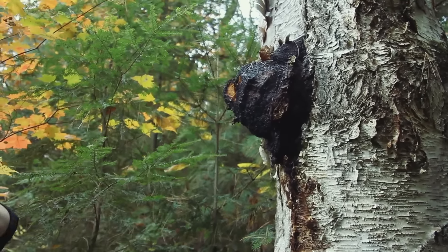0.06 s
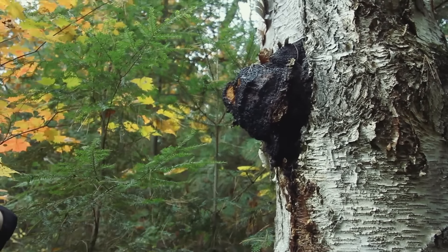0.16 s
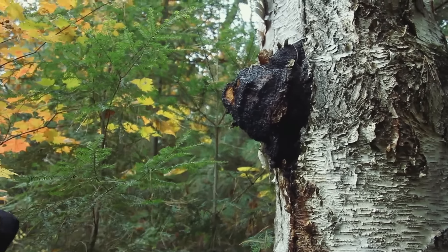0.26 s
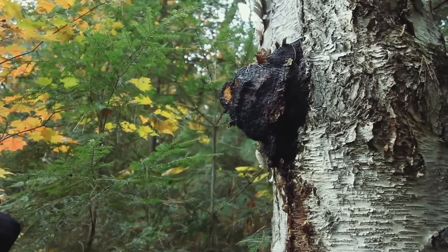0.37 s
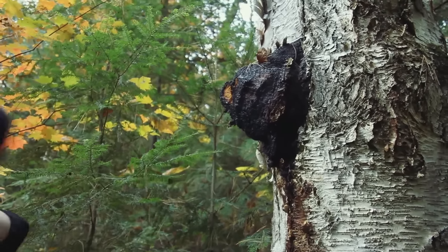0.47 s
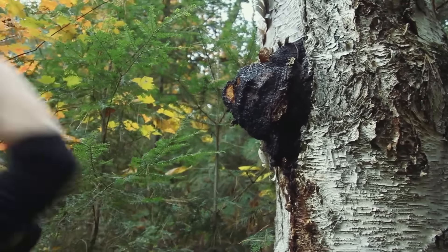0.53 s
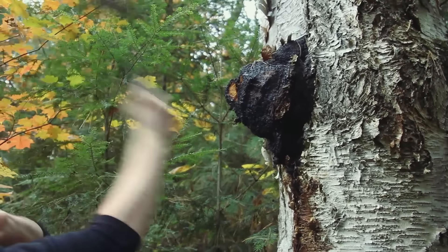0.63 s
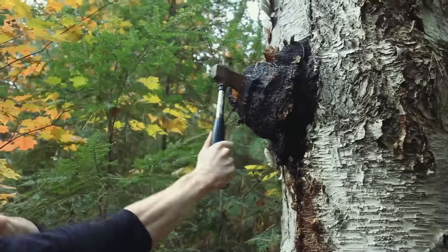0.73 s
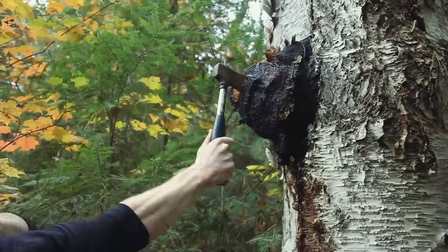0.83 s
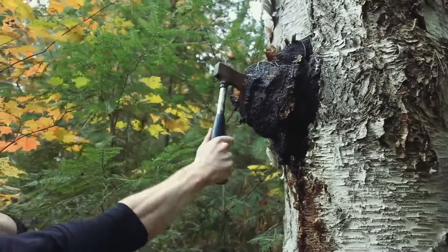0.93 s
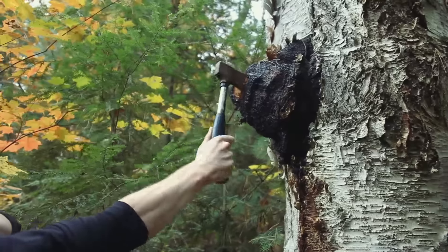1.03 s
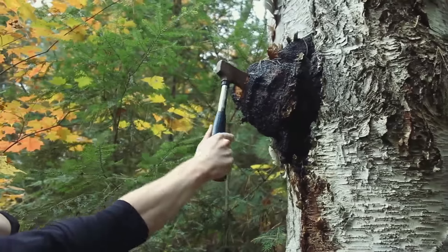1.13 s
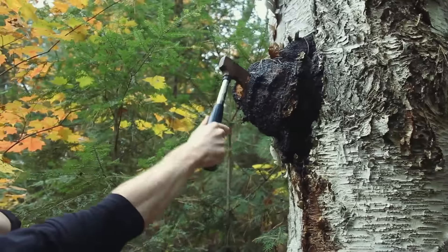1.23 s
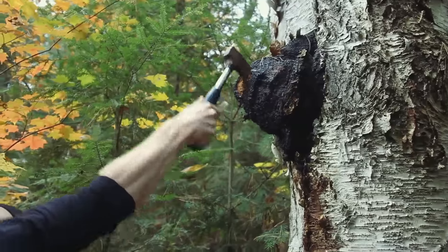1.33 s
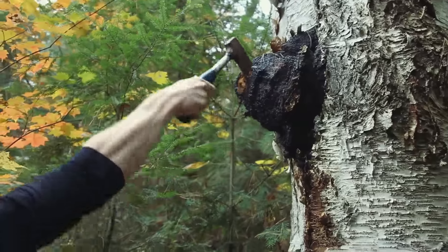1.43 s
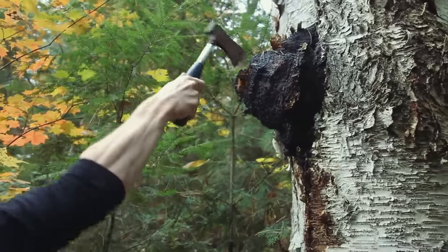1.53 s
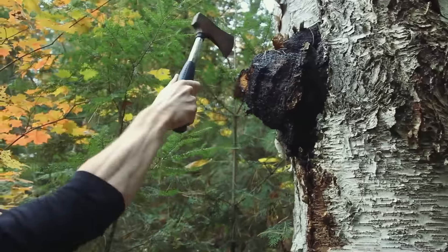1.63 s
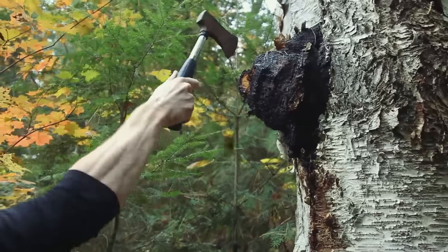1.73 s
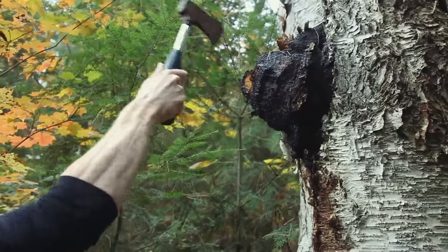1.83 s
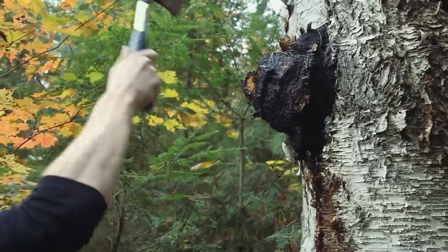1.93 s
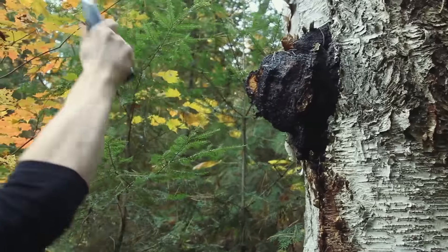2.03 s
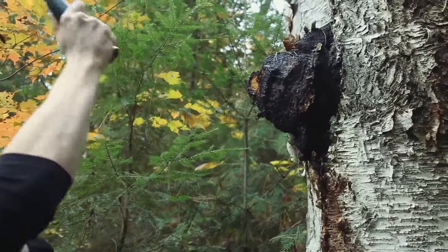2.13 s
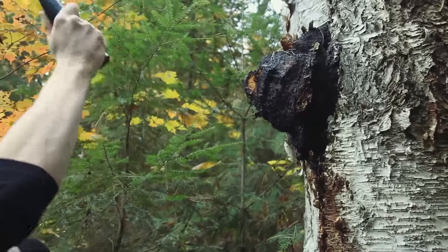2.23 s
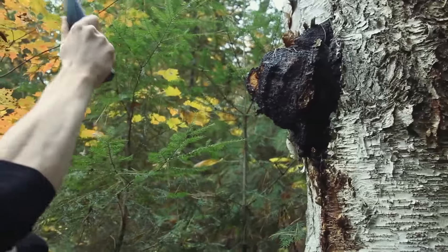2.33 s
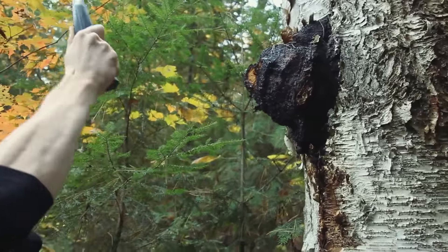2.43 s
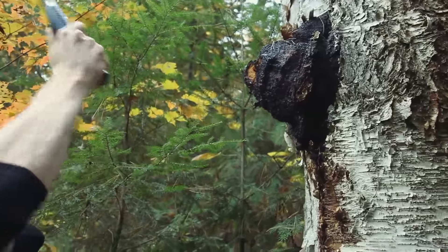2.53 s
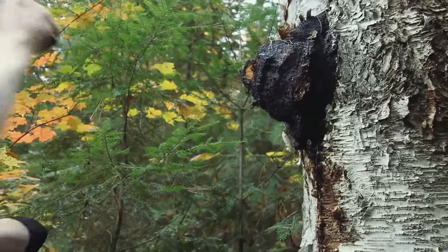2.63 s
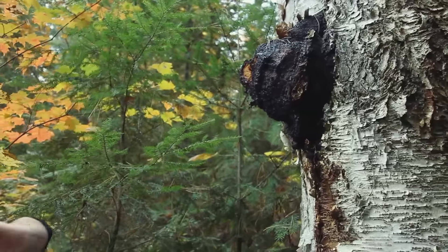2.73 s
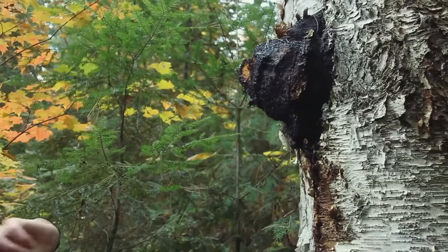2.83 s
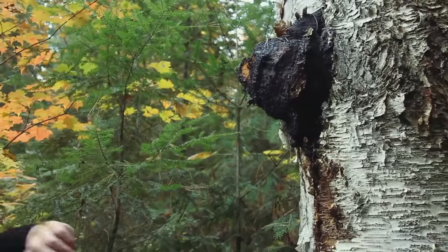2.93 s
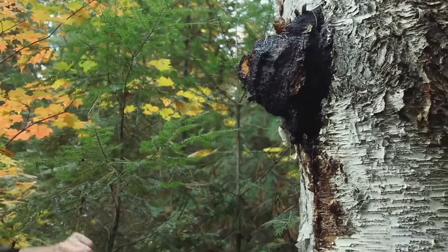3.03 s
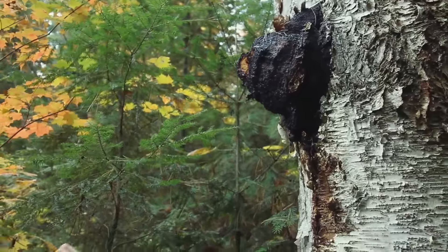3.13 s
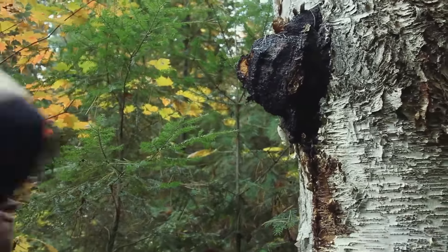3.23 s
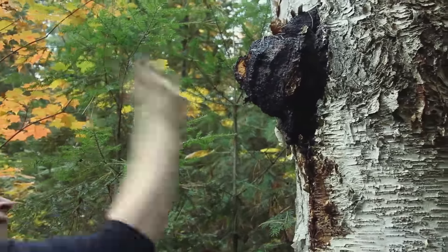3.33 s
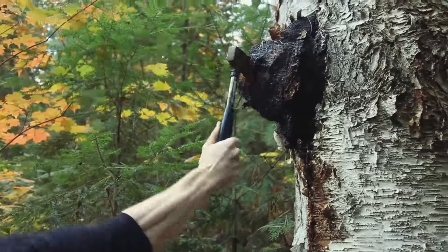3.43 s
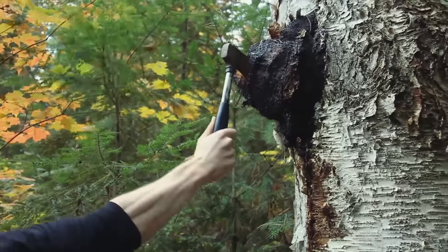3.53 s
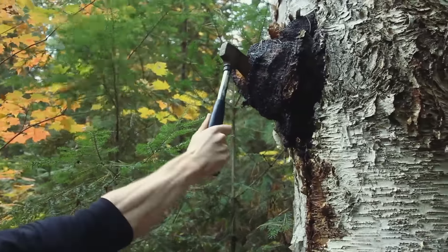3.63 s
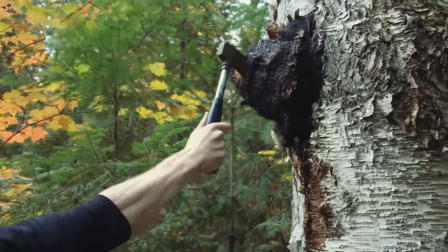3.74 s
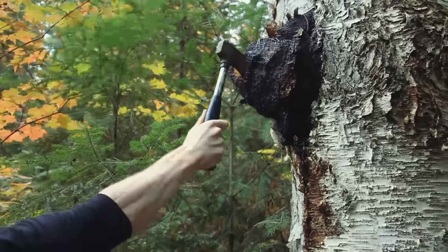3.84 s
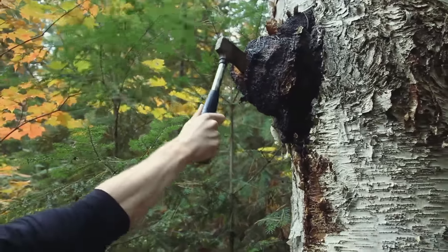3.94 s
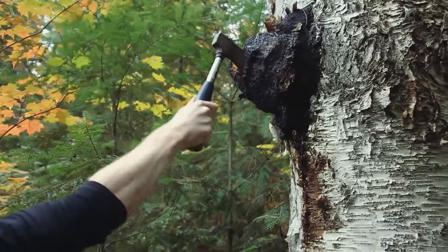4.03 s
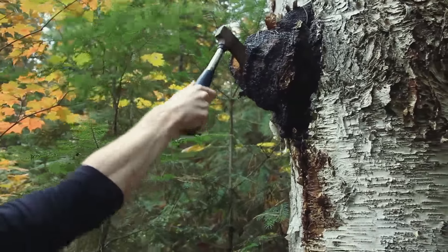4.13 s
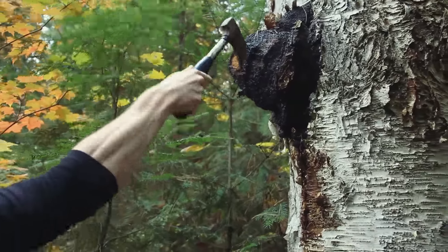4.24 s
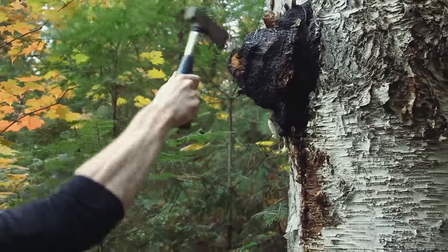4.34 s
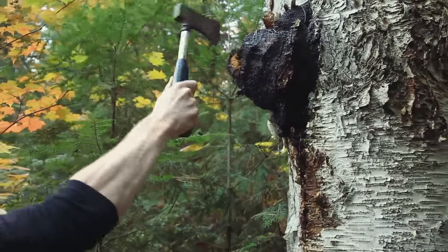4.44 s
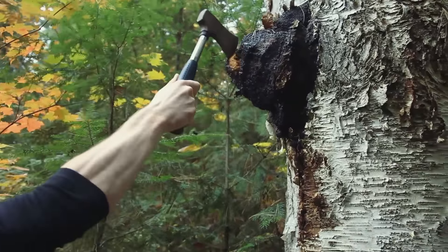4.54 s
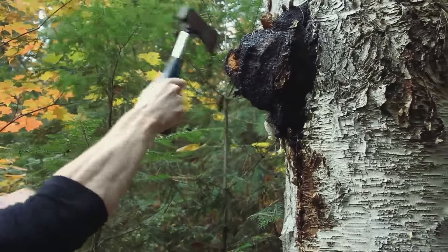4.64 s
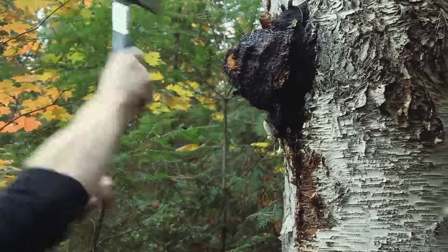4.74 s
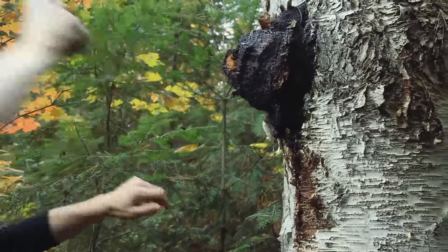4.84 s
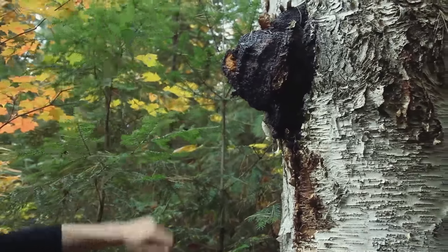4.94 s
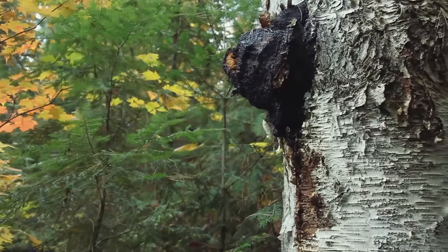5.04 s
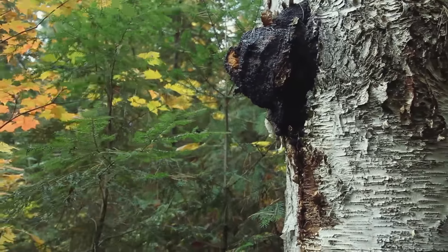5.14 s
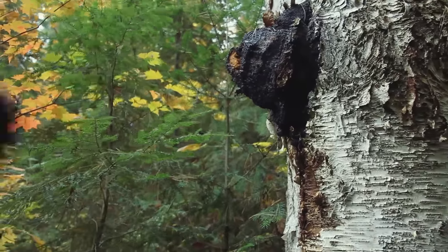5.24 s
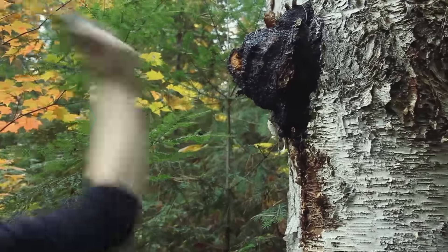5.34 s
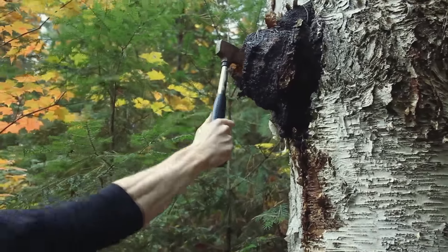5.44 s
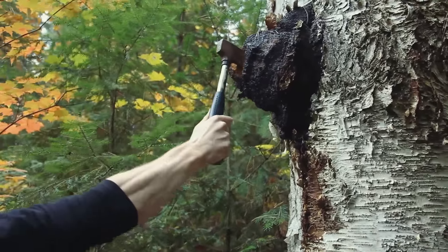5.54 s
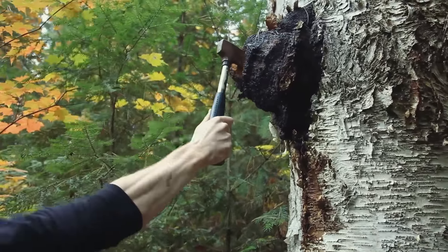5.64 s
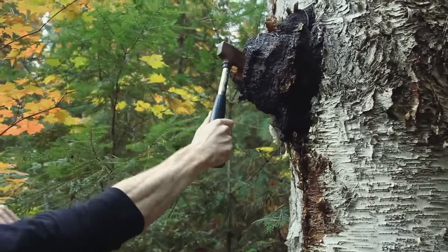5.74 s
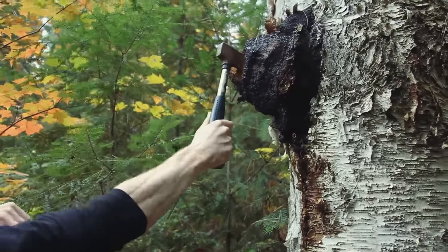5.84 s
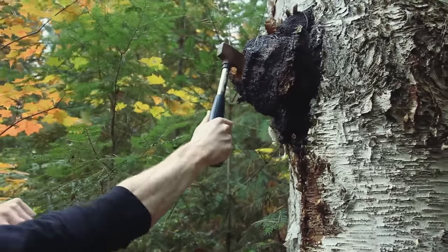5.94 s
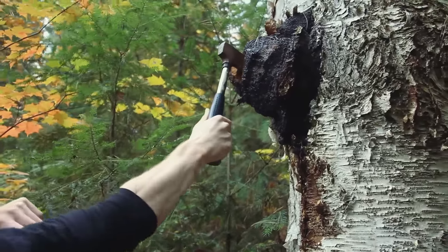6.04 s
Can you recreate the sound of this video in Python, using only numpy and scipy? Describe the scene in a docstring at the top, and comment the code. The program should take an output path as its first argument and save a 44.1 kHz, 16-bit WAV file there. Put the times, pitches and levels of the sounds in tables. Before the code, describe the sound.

Outdoors in a quiet forest, a hatchet strikes a hard crusty growth on a trunk three times, spaced a little over two seconds apart. Each blow is abrupt, very loud and distorted at a close microphone, with a bright crack, low thump and short woody knock. Small creaks, snaps and crumbling bits follow as the blade is levered free, a sleeve swishes softly, and faint echoes scatter among the trees.

```python
"""Three hatchet blows into a hard conk on a birch trunk: blade impact, cracking crust and damped modes. Each
opens with bright grit as the blade enters and drives a close microphone into overload, heard as clipping and a
low thump. The forest scatters a faint echo; the levered blade creaks by stick and slip, and crumbs crackle as
grains. A sleeve swishes as friction noise that follows the speed of the arm. Filtered noise makes a soft forest
hush with one puff of breeze and a far rumble that swells once."""
import sys
import numpy as np
from scipy import signal
from scipy.fft import rfft, irfft
from scipy.io import wavfile
from scipy.ndimage import uniform_filter1d

SR = 44100
rng = np.random.default_rng(int(sys.argv[2]) if len(sys.argv) > 2 else 0)


def master_out(mix):
    """Clip the mix to full scale and print it as 16-bit PCM to the path in sys.argv[1]."""
    frames = np.transpose(np.atleast_2d(mix))
    ceiling = np.clip(frames, -1, 1)
    pcm = np.round(ceiling * 32767).astype(np.int16)
    wavfile.write(sys.argv[1], SR, pcm)


N = 268216
T = np.arange(N) / SR

# Air in the trees: [f/Hz, level/dB]
FOREST_SPECTRUM = [(15, -1), (25, -5), (37, -8), (94, -7.5), (200, -15), (235, -10.5), (300, -10),
                   (542, -10.5), (621, -10), (730, -8.5), (982, -9.5), (2330, -22.5), (3490, -22.5),
                   (4580, -32), (15800, -44.5)]
# Breeze in the needles: [f/Hz, level/dB]
BREEZE_SPECTRUM = [(400, -31), (1000, -16), (1450, 9), (1900, -2), (4000, -36), (15000, -28)]
# Far low rumble: [f/Hz, level/dB]
RUMBLE_SPECTRUM = [(25, -34), (50, -9.5), (68, 7), (85, -7), (110, -30), (300, -55)]
# Falling crumbs and leaves: [f/Hz, level/dB]
CRUMB_SPECTRUM = [(500, -35), (1800, 2.5), (2700, -0.5), (3600, 7.5), (4800, -1), (7500, -6.5),
                  (11000, -11.5), (15500, -17.5)]
# Cloth of the sleeve: [f/Hz, level/dB]
CLOTH_SPECTRUM = [(400, -2.5), (1500, -2), (2800, -2.5), (3300, 5), (4000, -2), (6500, -4.5), (8500, -12),
                  (11500, -15), (15000, -27)]
# Crumbs and dry leaves stirred by each movement: [peak t/s, level/dB, half width to 1/e t/s]
RUSTLES = [(.12, -53, .06), (1.45, -53.5, 1), (2.2, -53.5, 0.099), (2.58, -46.5, 0.016), (3.22, -47, 0.18),
           (3.72, -45, 0.47), (4.3, -47.5, 0.79), (5.36, -48, 0.13), (5.8, -45, 0.16)]
# Sleeve on the backswings: [start t/s, length t/s, level/dB]
SWINGS = [(2.787, 0.23, -36), (4.923, 0.3, -43)]
# Dry crust under the blade: [f/Hz, level/dB]
GRIT_SPECTRUM = [(500, -31), (1800, -7.5), (2700, -4.5), (3600, 9), (4800, -0.5), (7500, -8), (11000, -13),
                 (15500, -24)]
# Modes of the conk answering a creak: [f/Hz, level/dB, t60/s]
CREAK_MODES = [(590, -2, 0.015), (1290, 15, 0.0027), (2140, 10, 0.0098), (2680, 11, 0.0032)]
# Brittle crust snapping under the lever, and stray ticks: [t/s, level/dB, conk level/dB, treble level/dB]
SNAPS = [(0.942, -41.5, -17, 4), (0.966, -46, -23, 7), (1.028, -45, -19, 8), (1.166, -44.5, -18, 9),
         (1.304, -28, -4.5, -20), (1.3432, -26.5, 4.5, -2), (1.424, -34, 0, -6), (2.274, -29.5, -2, -1),
         (2.856, -22, -17, -6), (3.235, -31, -6, -5), (3.6175, -20, -24, 2), (4.206, -36, -14, 3),
         (4.266, -32, -12, -12), (5.502, -17, -5, 0.5), (5.626, -35, 5, 0), (6.013, -27.5, -5.5, -6)]
# Blade scraping in the cut: [t/s, level/dB, time scale t/s]
SCRAPES = [(1.249, -42.5, .026), (1.401, -35.5, .017), (1.553, -40, 0.029), (2.297, -42.5, 0.02),
           (3.594, -24.5, 0.0073), (3.663, -34.5, 0.0084), (3.801, -31.5, 0.025), (3.825, -31.5, 0.036),
           (4.033, -31.5, 0.0079), (4.129, -38.5, 0.014), (4.159, -38.5, 0.022), (4.371, -40.5, 0.032),
           (4.4227, -37, 0.021), (4.61, -42.5, 0.022), (5.716, -36, 0.035), (5.882, -28.5, 0.0076),
           (6.072, -36.5, 0.0079)]
# Blows: [t/s, conk level/dB, trunk level/dB, crack level/dB, entry grit level/dB, cut at entry f/Hz, cut at
# rest f/Hz, cut level/dB, mode pitch factor, far echo level/dB, echo treble level/dB]
BLOWS = [(0.7679, 6.5, 8, 14, 12.5, 850, 423, 20, 0.95, -35, 1.5),
         (3.4630, 2, 4, 12.5, 16, 1364, 707, 18.5, 0.95, -44, 1),
         (5.4888, -7, 2.5, 10, 0.5, 2785, 490, 5.5, 0.9, -47, 15.5)]
# Trunk modes before the pitch factor: [f/Hz, level/dB, t60/s]
TRUNK_MODES = [(145, -18.5, 0.12), (194.6, -19, 0.1), (255.4, -3.5, 0.085), (330, -3, 0.064)]
# Conk modes before the pitch factor: [f/Hz, level/dB, t60/s]
CONK_MODES = [(427.4, 6, 0.043), (613.7, 3.5, 0.034), (726, 3, .039), (958, 0, 0.03), (1025, 9.5, 0.022),
              (1280, 2, 0.022)]
# Hatchet head damped by the cut, before the pitch factor: [f/Hz, level/dB, t60/s]
HEAD_MODES = [(2230, -6.5, 0.021), (2904, -6.5, 0.021), (3644, -10.5, 0.0057)]
# Breaking crust: [f/Hz, level/dB]
CRACK_SPECTRUM = [(500, 15.5), (1500, -5.5), (3300, 19), (4600, 2.5), (8000, -1), (15000, -22.5)]
# Bright grit of the blade entering at the start of a blow: [f/Hz, level/dB]
ENTRY_SPECTRUM = [(1000, -38), (2500, 12), (3800, 1.5), (5500, -2), (9000, -16), (13000, 6),
                  (16000, -12.5)]
# Echo from the trees: [f/Hz, level/dB]
ECHO_SPECTRUM = [(80, -6), (170, 1), (280, 1.5), (650, 2.5), (1050, -5.5), (1600, -14), (2900, -9.5),
                 (4500, -22), (12000, -52)]

FOREST_DB = -40.5
BREEZE_S, BREEZE_DB, BREEZE_WIDTH_S = 2.22, -49, 0.15
RUMBLE_DB = -52  # steady part
RUMBLE_SWELL_S, RUMBLE_SWELL_DB, RUMBLE_RISE_S, RUMBLE_FALL_S = 5.77, -46, 1.3, 0.5
SNAP_S = 0.0036  # time scale of a snap
SNAP_TREBLE_HZ = 6000  # corner above which each snap is made brighter or duller by its own treble level
SCRAPE_BODY_DB = -5  # conk under a scrape
CRACK_LOW_HZ = 450  # low cut of the breaking crust
TOP_HZ = 16000  # low-pass of the microphone signal


def undb(db):
    """Level definition: decibels to amplitude gain."""
    return 10 ** (np.asarray(db) / 20)


def unit(x):
    """Normalisation: scale to rms 1."""
    return x / np.sqrt(np.mean(x ** 2))


def colour(x, points, size=4096):
    """Minimum-phase filtering: a causal response of unit energy shaped by [f/Hz, level/dB] points."""
    hz, db = np.transpose(points)
    grid = np.maximum(np.fft.rfftfreq(size, 1 / SR), 1)
    level = np.interp(np.log(grid), np.log(hz), db)
    # folding the cepstrum onto positive times makes the response causal
    cepstrum = irfft(np.log(undb(level)))
    cepstrum[1:size // 2] *= 2
    cepstrum[size // 2 + 1:] = 0
    response = irfft(np.exp(rfft(cepstrum)))
    return signal.fftconvolve(x, response / np.linalg.norm(response))[:len(x)]


def treble_shelf(x, order, hz, db):
    """Shelving: the part above a corner frequency is raised or lowered and recombined."""
    high_pass = signal.butter(order, hz, "high", fs=SR)
    return x + (undb(db) - 1) * signal.lfilter(*high_pass, x)


def fade(t, t60):
    """Exponential damping: a fall of 60 dB in t60 seconds."""
    return np.exp(-np.log(1000) * t / t60)


def ring(t, modes, pitch=1):
    """Modal superposition: damped sines, with neighbours swinging in opposite directions."""
    total = np.zeros(len(t))
    for k, (hz, db, t60) in enumerate(modes):
        mode = undb(db) * np.sin(2 * np.pi * hz * pitch * t) * fade(t, t60)
        total += (-1) ** k * mode
    return total


def grains(n, per_s, spread_db):
    """Random fracture: sparse impulses of either sign, most weak and a few strong; rms 1."""
    sizes = undb(spread_db * np.minimum(rng.exponential(size=n), 4))
    signs = rng.choice([-1, 1], n)
    occurs = rng.random(n) < per_s / SR
    return unit(signs * sizes * occurs)


def walk(rate):
    """Slow fluctuation: held random values smoothed into a drift with a spread near 1."""
    k = int(SR / rate)
    held = np.repeat(rng.standard_normal(N // k + 1), k)
    return uniform_filter1d(held, k)[:N]


def swell(peak_s, db, rise_s, fall_s):
    """Gaussian envelope: the gain of a movement that gathers speed, peaks and slows."""
    width = np.where(T < peak_s, rise_s, fall_s)
    return undb(db) * np.exp(-((T - peak_s) / width) ** 2)


def add(out, s, x):
    """Linear superposition: mix x in at time s."""
    i = int(s * SR)
    out[i:i + len(x)] += x[:max(N - i, 0)]


def forest():
    """Broadband noise of air in trees: a steady hush, one puff of breeze and a far rumble that swells."""
    hush = colour(rng.standard_normal(N), FOREST_SPECTRUM) * undb(FOREST_DB + 0.5 * walk(3.6))
    puff = swell(BREEZE_S, BREEZE_DB, BREEZE_WIDTH_S, BREEZE_WIDTH_S)
    breeze = colour(rng.standard_normal(N), BREEZE_SPECTRUM) * puff
    rumble_gain = undb(RUMBLE_DB) + swell(RUMBLE_SWELL_S, RUMBLE_SWELL_DB, RUMBLE_RISE_S, RUMBLE_FALL_S)
    rumble = colour(rng.standard_normal(N), RUMBLE_SPECTRUM) * rumble_gain
    return hush + breeze + rumble


def sleeve(swing_power=1.06):
    """Friction noise: dense contacts in cloth grow with the speed of the arm."""
    arm = np.zeros(N)
    for s, length, db in SWINGS:
        stroke = np.clip((T - s) / length, 0, 1)
        arm += undb(db) * np.sin(np.pi * stroke) ** swing_power
    rubbing = grains(N, per_s=19000, spread_db=3.0) * arm * undb(1.7 * walk(50))
    return colour(rubbing, CLOTH_SPECTRUM)


def crumbs(chip_db=-6, chips_per_s=45):
    """Granular impact noise: crumbs crackle finely, with a larger chip now and then."""
    # separate movements add in power
    stir = np.sqrt(sum(swell(s, db, width, width) ** 2 for s, db, width in RUSTLES))
    fine = grains(N, per_s=3000, spread_db=3.5) * undb(2 * walk(60))
    chips = undb(chip_db) * grains(N, chips_per_s, spread_db=2.5)
    return colour((fine + chips) * stir, CRUMB_SPECTRUM)


def slip(time_scale, body_db, tail_db, tail_t60, per_s, spread_db):
    """Stick and slip: pressure builds and lets go, crunching the crust and tapping the conk."""
    t = T[:SR // 5]
    age = t / time_scale
    pressure = np.sqrt(2 * np.e * age) * np.exp(-age ** 2 - age)
    tail = undb(tail_db) * fade(t, tail_t60)
    slips = grains(len(t), per_s, spread_db) * (pressure + tail)
    body = ring(t, CREAK_MODES)
    answer = signal.fftconvolve(slips, body / np.linalg.norm(body))[:len(t)]
    return colour(slips, GRIT_SPECTRUM) + undb(body_db) * answer


def creaks():
    """Intermittent friction and fracture: levering the blade gives snaps and scrapes."""
    out = np.zeros(N)
    for s, db, body_db, treble_db in SNAPS:
        snap = undb(db) * slip(SNAP_S, body_db, tail_db=-20, tail_t60=0.19, per_s=9000, spread_db=4.5)
        add(out, s, treble_shelf(snap, 1, SNAP_TREBLE_HZ, treble_db))
    for s, db, time_scale in SCRAPES:
        scrape = slip(time_scale, SCRAPE_BODY_DB, tail_db=-16.5, tail_t60=0.55, per_s=5700, spread_db=3.5)
        add(out, s, undb(db) * scrape)
    return out


def tree_echo(t, conk_db, echo_db, bright_db):
    """Multiple scattering: ground and near branches reflect at once, surrounding trunks later."""
    near = undb(-22 + conk_db) * fade(t, 0.097)
    # the trunks answer most strongly after about 0.095 s, over a fading tail
    far = np.exp(-((t - 0.095) / 0.069) ** 2) + undb(-6) * fade(t, 1.0)
    scattered = grains(SR, per_s=1800, spread_db=2.0) * (near + undb(echo_db) * far)
    return treble_shelf(colour(scattered, ECHO_SPECTRUM), 2, 1800, bright_db)


def crust_break(t, crack_t60=0.017, splinter_db=-37.0, splinter_t60=0.13):
    """Brittle fracture: a burst over in milliseconds; splinters go on while the blade comes to rest."""
    breaking = fade(t, crack_t60) + undb(splinter_db) * fade(t, splinter_t60)
    crust = colour(rng.standard_normal(SR) * breaking, CRACK_SPECTRUM)
    return signal.lfilter(*signal.butter(2, CRACK_LOW_HZ, "high", fs=SR), crust)


def blade_cut(t, entry_hz, rest_hz, sink_s=0.003115, push_db=-13, cut_t60=0.023):
    """Mass loading: the sinking blade carries more and more of the conk, so the pitch of the cut drops."""
    cut_hz = rest_hz + (entry_hz - rest_hz) * np.exp(-t / sink_s)
    swing = np.cos(2 * np.pi * np.cumsum(cut_hz) / SR)
    # a one-sided push gives the low thump of the overloaded input
    return (swing - undb(push_db)) * fade(t, cut_t60)


def entry_grit(t, grit_t60=0.0093):
    """Blade entry: a short burst of bright, decaying grit at the start of a blow."""
    return colour(rng.standard_normal(SR) * fade(t, grit_t60), ENTRY_SPECTRUM)


def blows():
    """Impact excitation: the blade cracks the crust and sets cut, conk and trunk ringing; trees answer."""
    out, t = np.zeros(N), T[:SR]
    for (s, conk_db, trunk_db, crack_db, grit_db, entry_hz, rest_hz, cut_db,
         pitch, echo_db, bright_db) in BLOWS:
        conk = undb(conk_db) * ring(t, CONK_MODES, pitch)
        trunk = undb(trunk_db) * ring(t, TRUNK_MODES, pitch)
        cut = undb(cut_db) * blade_cut(t, entry_hz, rest_hz)
        crack = undb(crack_db) * (crust_break(t) + ring(t, HEAD_MODES, pitch))
        grit = undb(grit_db) * entry_grit(t)
        echo = tree_echo(t, conk_db, echo_db, bright_db)
        add(out, s, grit + crack + cut + conk + trunk + echo)
    return out


def scene():
    """Superposition of all sources at one microphone."""
    return (forest() + sleeve() + crumbs() + creaks() + blows())[None]


def record(dry):
    """Overload: the input clips flat at full scale, then a low-pass cuts the top."""
    clipped = np.clip(dry, -1, 1)
    low_pass = signal.firwin(255, TOP_HZ, fs=SR)
    return signal.fftconvolve(clipped, low_pass[None], mode="same")


dry = scene()
out = record(dry)
master_out(out)
```